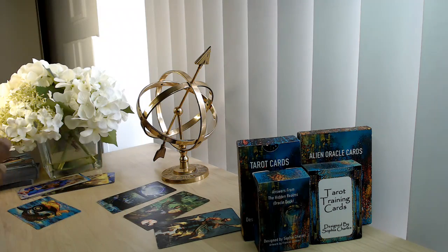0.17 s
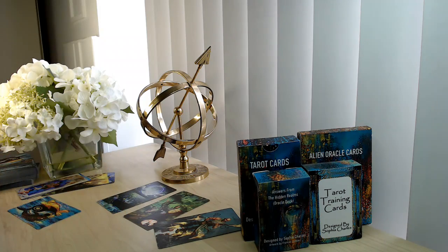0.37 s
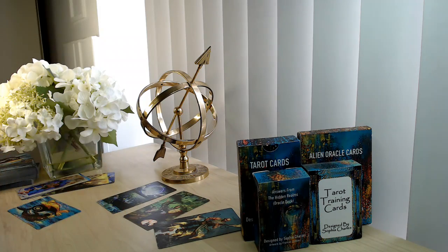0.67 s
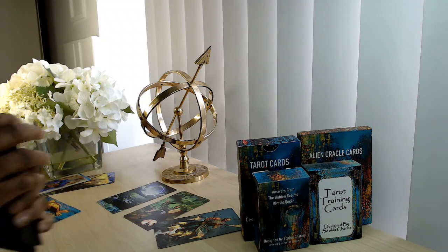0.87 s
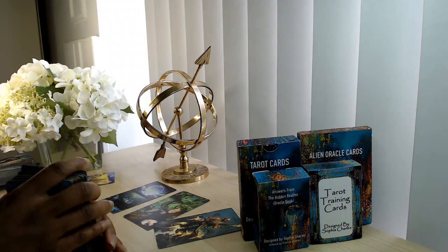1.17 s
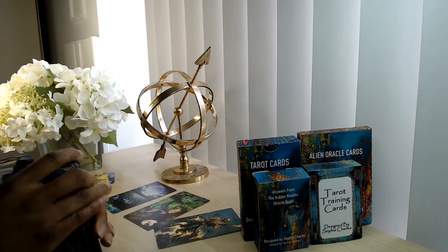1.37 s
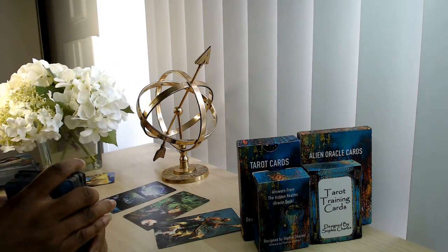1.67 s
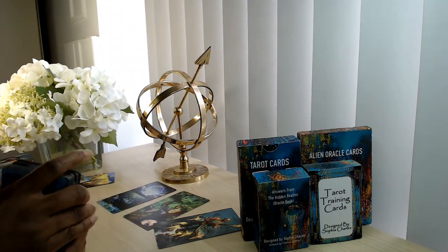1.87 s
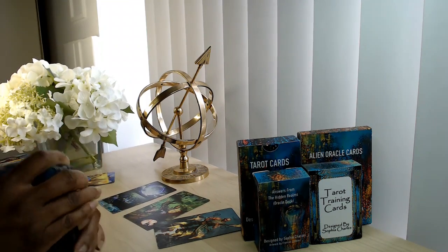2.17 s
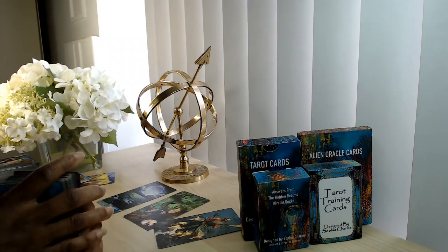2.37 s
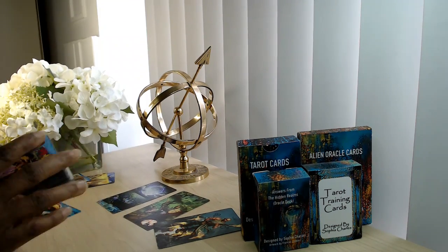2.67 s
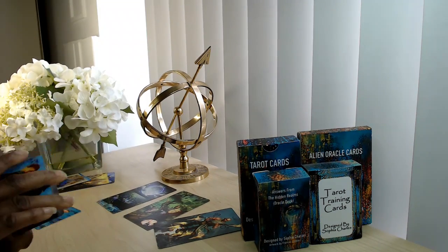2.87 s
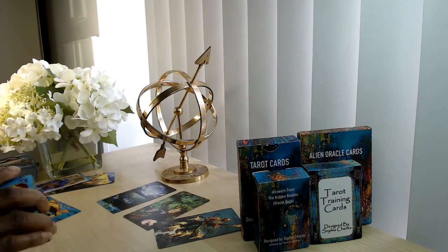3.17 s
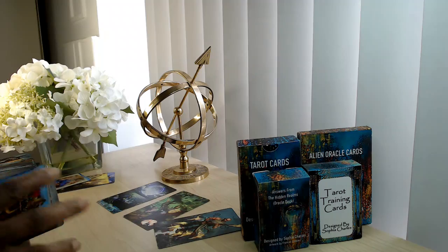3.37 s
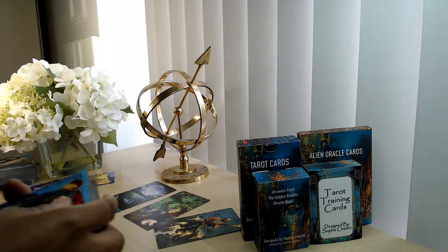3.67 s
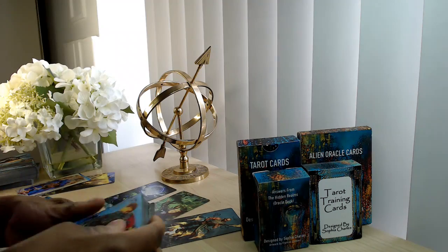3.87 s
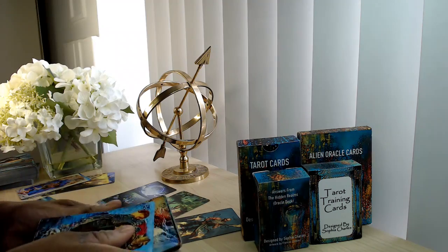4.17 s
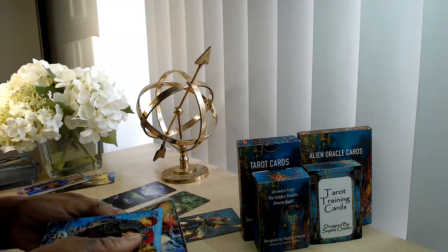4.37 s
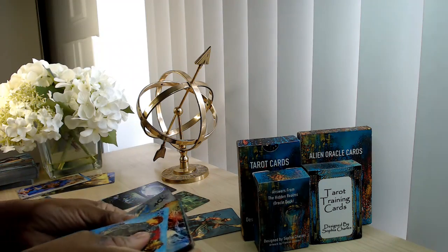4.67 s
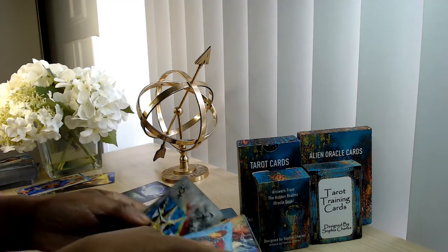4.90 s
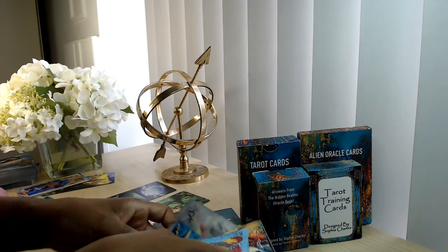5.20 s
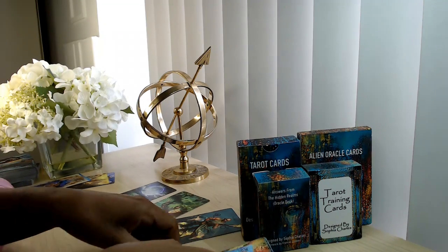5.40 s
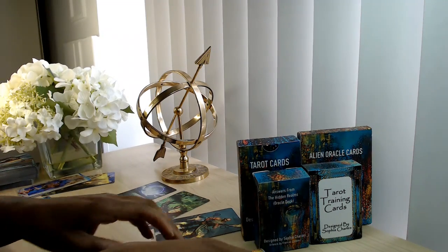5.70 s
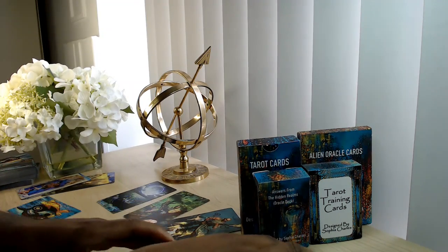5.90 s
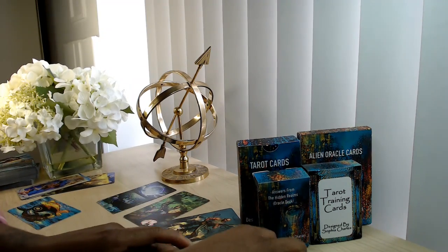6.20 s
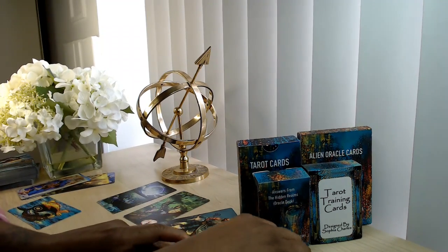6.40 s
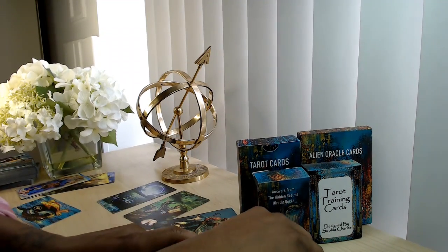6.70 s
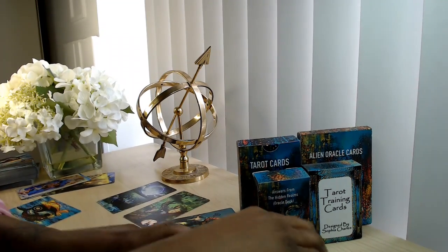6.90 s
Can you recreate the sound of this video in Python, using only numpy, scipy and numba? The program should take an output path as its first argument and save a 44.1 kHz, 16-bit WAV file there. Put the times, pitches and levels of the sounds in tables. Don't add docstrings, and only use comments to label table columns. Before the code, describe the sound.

Close stereo microphone in a small furnished room with a faint low hum. After slight card rustling, a deck of cards is knocked three times on a wooden table, sharp and woody with small rattling bounces. A quiet pause follows with faint handling, then a sudden crisp flick starts a flurry of snaps, papery slides and soft pats, ending with one card slapped down and a few faint touches.

```python
import sys
import numpy as np
from scipy import signal
from scipy.fft import rfft, irfft
from scipy.io import wavfile
from scipy.ndimage import uniform_filter1d
from numba import njit

SR = 44100
rng = np.random.default_rng(int(sys.argv[2]) if len(sys.argv) > 2 else 0)


def master(y):
    cut = np.clip(np.atleast_2d(y).T, -1, 1)
    pcm = np.round(cut * 32767)
    wavfile.write(sys.argv[1], SR, pcm.astype(np.int16))


def invert_db(level):
    return 10 ** (np.asarray(level, dtype=float) / 20)


N = 310860
PORT_TILT_DB = np.array([[-1.2], [1.2]])
HANDS_PAN_DB = -4


def colour(x, points):
    hz, db = np.transpose(points)
    f = np.log(np.maximum(np.arange(1025) * SR / 2048, 1))
    c = irfft(np.interp(f, np.log(hz), db) * np.log(10) / 20)
    c[1:1024] *= 2
    c[1025:] = 0
    return signal.fftconvolve(x, irfft(np.exp(rfft(c))))[:len(x)]


def band(x, lo_hz, hi_hz):
    sos = signal.butter(2, [lo_hz, min(hi_hz, .49 * SR)], "band", fs=SR, output="sos")
    return signal.sosfilt(sos, x)


def unit(x):
    return x / np.sqrt(np.mean(x ** 2))


def ring(hz, t60, phase=0.):
    t = np.arange(SR // 2) / SR
    return np.sin(2 * np.pi * hz * t + phase) * 1000 ** (-t / np.maximum(t60, .001))


def add(out, s, sound, db, pan_db):
    i = int(s * SR)
    sound = sound[:N - i] / np.abs(sound).max()
    out[:, i:i + len(sound)] += sound * invert_db(db + np.array([[pan_db], [-pan_db]]) / 2)


def walk(rate):
    k = int(SR / rate)
    steps = np.repeat(rng.standard_normal(N // k + 1), k)
    return 1.2 * uniform_filter1d(steps, k)[:N]


@njit
def svf(x, hz, width):
    y, b, l = np.empty(len(x)), 0., 0.
    for i in range(len(x)):
        g, k = np.tan(np.pi * hz[i] / SR), width / hz[i]
        v = (b + g * (x[i] - l)) / (1 + g * (g + k))
        b, l, y[i] = 2 * v - b, l + 2 * g * v, k * v
    return y


def swell(s, db, rise_s, fall_s):
    t = np.arange(0, N + 64, 64) / SR - s[:, None]
    rising = -t / np.maximum(rise_s, .002)[:, None]
    falling = t / np.maximum(fall_s, .002)[:, None]
    return invert_db(db[:, None] - 30 * np.where(t < 0, rising, falling))


def total(gains, rest_db):
    power = np.sum(gains ** 2, 0) + invert_db(rest_db) ** 2
    return np.interp(np.arange(N), 64 * np.arange(len(power)), np.sqrt(power))


# pitch_hz, level_db (per Hz)
AIR = [(50, -23.5), (90, -6), (140, -3.5), (180, -8), (240, -7), (380, -19), (640, -20.5), (900, -20),
       (1300, -28), (2500, -30.5), (5000, -36.5), (8000, -44.5), (10000, -53), (16000, -60)]
AIR_DB = -74


def air():
    mid, side = (colour(rng.standard_normal(N) * invert_db(0.76 * walk(12)), AIR) for _ in range(2))
    side = colour(side, [(100, -7.0), (800, -6.0), (4000, -3.5), (15000, 8.0)])
    shared = unit(mid) * invert_db(AIR_DB + PORT_TILT_DB)
    return shared + side / mid.std() * invert_db(AIR_DB) * np.array([[1], [-1]])


# pitch_hz, level_db
WHINE = [
    (5470, -103),
    (8000, -97.5),
]


def whine():
    t = np.arange(N) / SR
    (hz, db), (frame_hz, frame_db) = WHINE
    frames = np.clip(1.6 * np.cos(2 * np.pi * (30 * t - .6)), 0, 1)
    steady = invert_db(db + 2 * walk(32)) * np.sin(2 * np.pi * hz * t)
    return steady + invert_db(frame_db) * frames * np.sin(2 * np.pi * frame_hz * t)


# peak_s, level_db, rise_s, fall_s; both spans cover 30 dB
SWELLS = [(.06, -52, 0.58, 0.11), (1.66, -53, 0.16, 0.34), (.29, -50.5, 0.11, 0.24),
          (.57, -53.5, 0.44, 0.11), (.78, -56, 0.16, 0.31), (1.052, -48, 0.16, 0.36),
          (1.38, -51.5, 0.54, 0.75), (1.75, -53.5, 0.58, 0.8), (2.168, -59.5, 0.11, 0.23),
          (2.76, -55.5, 0.21, .25), (1.8, -53.5, 0.14, 0.23), (3.27, -62, 0.18, .2),
          (2.95, -60, 0.23, 0.53), (3.47, -55, 0.17, 0.36), (3.92, -52, 0.11, 0.16), (4.2, -52, 0.19, 0.23),
          (4.67, -56, 0.2, 0.2), (4.93, -53, 0.32, 0.085), (5.16, -54.5, 0.18, 0.33),
          (5.38, -58.5, 0.57, 0.071), (6.06, -71.5, 0.27, 0.096), (6.14, -51, .15, 0.11),
          (6.52, -60, 0.38, 0.34), (6.79, -60, 0.45, 0.58)]
# level_db, build_s, first_null_s, t60_s
SWAY = [
    (-35.5, .09, 0.22, 0.61),
    (-37, .05, 0.19, 1),
    (-33, .06, 0.49, 0.81),
    (-25, 0.039, .21, 0.85),
]
DRONE_HZ, DRONE_DB, FLUTTER_DB = 48, -65, 1.5


def drone():
    t = np.arange(N) / SR
    size = total(swell(*np.transpose(SWELLS)), DRONE_DB) * invert_db(FLUTTER_DB * walk(20))
    for (s, *_), (db, build_s, null_s, t60) in zip(KNOCKS, SWAY):
        since = np.maximum(t - s, 0)
        beating = np.cos(np.pi / 2 * since / null_s) * 1000 ** (-since / t60)
        size = size + invert_db(db) * (1 - np.exp(-since / build_s)) * beating
    return np.sqrt(2) * np.sin(2 * np.pi * DRONE_HZ * t) * size * invert_db(PORT_TILT_DB)


# pitch_hz, t60_s
ROOM = [(100, 0.36), (400, 0.28), (1500, .28), (3000, 0.26), (6000, 0.25), (12000, 0.22)]
ROOM_DB = -1
EARLY_T60_S, LATE_DB = 0.03, -8.5


def room(dry):
    t, tail = np.arange(SR // 2) / SR, 0
    hz, t60 = np.transpose(ROOM)
    for f in 60 * 2 ** np.arange(0, 8.5, .5):
        mid, side = band(rng.standard_normal((2, len(t))), f / 2 ** .25, f * 2 ** .25)
        decay = np.interp(np.log(f), np.log(hz), t60)
        apart = np.clip(f / 1800, .35, 1)
        fade = 1000 ** (-t / EARLY_T60_S) + invert_db(LATE_DB) * 1000 ** (-t / decay)
        both = unit(mid * fade) + apart * unit(side * fade) * np.array([[1], [-1]])
        tail = tail + both * np.sqrt(f / (1 + apart ** 2))
    tail = tail * np.clip(t / 0.0015 - .5, 0, 1)
    tail = tail / np.sqrt(np.sum(tail[0] ** 2))
    return invert_db(ROOM_DB) * signal.fftconvolve(tail, dry.mean(0)[None])[:, :N]


# start_s,
# level_db, pitch_hz, t60_s
PATS = [(1.818, -57, 422, 0.094), (3.905, -59.5, 271, 0.15), (4.677, -50.5, 350, 0.099),
        (4.772, -31, 695, 0.065), (4.799, -54, 716, 0.075), (5.344, -31, 354, 0.028),
        (5.358, -38, 343.6, 0.18), (5.552, -47.5, 339, 0.36), (5.712, -43, 720, 0.11),
        (5.732, -41.5, 710, 0.078), (6.044, -43.5, 358, 0.14), (6.128, -62, 754, 0.11),
        (5.729, -57.5, 3326, 0.2), (3.742, -51, 1410, 0.12), (3.72, -60.5, 430, 0.13),
        (3.937, -55, 924, 0.092), (6.898, -57, 355, 0.14), (0.502, -62, 1235, 0.17), (.53, -59, 710, .08),
        (4.788, -41, 1080, 0.065), (4.789, -39.5, 393, 0.14), (5.002, -41.5, 1048, 0.044),
        (5.225, -41.5, 1075, 0.19), (5.43, -55, 800, 0.11), (5.639, -39, 333, 0.18),
        (6.051, -41, 456, 0.086), (6.38, -65, 350, 0.36), (6.86, -65.5, 749, 0.067)]
# start_s, level_db, pitch_hz, t60_s
THUDS = [(4.668, -46.5, 89.4, 0.054), (4.685, -43.5, 96, 0.13), (4.78, -46, 254, 0.072),
         (4.94, -46, 170, 0.05), (5.198, -47, 193, 0.027), (5.345, -39.5, 208, 0.036),
         (6.045, -49.5, 109.4, 0.22), (1.62, -42.5, 119, 0.19), (4.661, -52.5, 188.8, .12),
         (5.189, -46.5, 339, .1)]


def pats():
    out = np.zeros((2, N))
    for s, db, hz, t60 in PATS + THUDS:
        push = 1 - np.exp(-np.arange(SR // 2) / SR / 0.0036)
        beat = invert_db(5 * walk(130)[:SR // 2])
        grain = unit(band(rng.standard_normal(SR // 2), .6 * hz, 1.7 * hz)) * ring(0, 0.71 * t60, np.pi / 2)
        tone = ring(hz, t60) + 0.25 * grain + 0.064 * ring(0.49 * hz, 1.2 * t60)
        add(out, s, push * beat * tone, db - 3.0, HANDS_PAN_DB)
    return out


# fastest_s, card_level_db, speed_up_s, slow_down_s, hiss_db; spans cover 30 dB
SLIDES = [(4.77, -43, 0.015, 0.085, 2), (4.797, -35.5, 0.018, 0.12, -28), (4.84, -44, 0.012, 0.072, -30),
          (4.91, -54, 0.2, 0.45, -29), (4.951, -46.5, 0.035, 0.078, -11), (4.977, -46.5, 0.2, 0.095, -14),
          (5.04, -76, 0.15, 0.44, -16), (5.15, -61.5, 0.071, 0.23, -23), (5.179, -53, 0.008, 0.1, -17),
          (5.219, -37.5, 0.024, 0.023, -26), (5.242, -31, 0.043, 0.023, -13),
          (5.265, -61.5, 0.033, 0.06, 6), (5.337, -53.5, 0.006, 0.077, -31),
          (5.354, -49, 0.026, 0.089, -33), (5.566, -50.5, 0.045, 0.13, -22),
          (5.611, -48.5, 0.043, 0.045, -20), (5.704, -57, 0.039, 0.15, -24), (5.76, -67, 0.13, 0.065, 0),
          (6.044, -64, 0.0085, 0.17, -32.5)]
# fastest_s, card_level_db, speed_up_s, slow_down_s, hiss_db
FIDGETS = [(.12, -105, 0.085, 0.047, 32), (.21, -111, 0.068, 0.071, 33), (.284, -81.5, 0.031, 0.19, 1),
           (.546, -68.5, 0.16, 0.082, -4), (0.665, -64, 0.023, 0.085, -14), (1.78, -82, 0.09, 0.025, 9),
           (3.25, -102.5, 0.12, 0.3, 27), (3.64, -90, 0.095, 0.41, 14.5), (3.727, -60, 0.06, 0.14, -21),
           (3.774, -69.5, 0.14, 0.043, -1), (3.939, -68, 0.036, 0.067, 5), (4.14, -77.5, 0.16, 0.13, 5.5),
           (4.225, -72, 0.052, 0.071, 0.5), (4.451, -71.5, 0.069, 0.19, 1.5), (4.54, -80.5, 0.088, 0.11, 0),
           (4.66, -78, 0.16, 0.33, -18.5), (6.219, -76.5, 0.022, 0.065, 11.5),
           (6.486, -81.5, 0.065, 0.23, -1), (6.865, -87, 0.076, 0.16, 11)]
# fastest_s, level_db, speed_up_s, slow_down_s
DRAGS = [(3.75, -62.5, .1, 0.16), (4.66, -61, 0.081, 0.084), (0.674, -54, .02, 0.13),
         (3.94, -81, 0.017, 0.15), (4.789, -35.5, 0.033, 0.03), (5.04, -63, 0.16, 0.12),
         (5.36, -44, 0.063, 0.022), (5.411, -45.5, 0.065, 0.039), (6.047, -45.5, 0.016, 0.1),
         (6.87, -77, 0.058, 0.1)]
# time_s, pitch_hz
BEND = [(.3, 2000), (.66, 1720), (3.75, 1607), (4.4, 2400), (4.8, 2470), (4.97, 2171), (5.22, 1880),
        (5.35, 2250), (5.56, 1620), (6.1, 1600)]
# pitch_hz, width_hz, level_db
TOP = [(393, 180, -2.5), (716, 64, -0.5), (1080, 28, -2.5)]
WOOD_DB, WOOD_DB_PER_DB, REST_DB = 4, -.5, -91.5


def slides():
    s, db, rise, fall, hiss_db = np.transpose(SLIDES + FIDGETS)
    speed = swell(s, db, rise, fall)
    hz = np.interp(np.arange(N) / SR, *np.transpose(BEND))
    wood_db = WOOD_DB + WOOD_DB_PER_DB * (db + 68.0)
    slip_db = np.minimum(2.4 * rng.exponential(size=N), 11)
    grit = rng.standard_normal(N) * invert_db(slip_db + 2 * walk(200) + 1.5 * walk(60))
    card = unit(svf(grit, hz * (1 + .08 * walk(40)), 550.)) + .6 * unit(band(grit, 1400, 3800))
    card += 0.033 * unit(svf(grit, 0.44 * hz * (1 + 0.064 * walk(35)), 500.))
    card += 0.083 * unit(svf(grit, 3350 * (1 + 0.068 * walk(30)), 300.))
    table_grit = grit[::-1].copy()
    wood = invert_db(1.4 * walk(30)) * unit(band(band(table_grit, 270, 1800), 210, 1700))
    modes = sum(invert_db(top_db) * svf(table_grit, np.full(N, 1. * f), 1. * w) for f, w, top_db in TOP)
    wood = 0.38 * wood + 0.87 * unit(modes)
    bright = grit + 2.5 * svf(grit, 5200 * (1 + 0.3 * walk(25)), 1600.)
    hiss = unit(colour(bright, [(2500, -25.5), (3600, 13.0), (6500, 0.5), (8500, -10.5),
                                (11000, -12.0), (15500, -15.5)]))
    wood_gains = np.vstack([speed * invert_db(wood_db)[:, None], swell(*np.transpose(DRAGS))])
    rub = card * total(speed, REST_DB) + wood * total(wood_gains, REST_DB + 7.5)
    rub += invert_db(2.3 * walk(81)) * hiss * total(speed * invert_db(hiss_db)[:, None], REST_DB - 5)
    return rub * invert_db(-6.0 + PORT_TILT_DB)


# start_s, level_db, pitch_hz, chatter_db
TICKS = [(0.661, -46, 1310, -38), (0.674, -41, 1780, -29), (3.249, -64.5, 1483, 9),
         (3.748, -43.5, 1470, -5.5), (3.932, -48, 1070, -6), (4.659, -58.5, 2437, -13),
         (4.7598, -50, 1080, -18), (4.764, -28.5, 2260, -26), (4.7874, -13, 2010, 3.5),
         (4.832, -17.5, 2390, -8), (4.856, -26.5, 2080, -29), (4.91, -36, 2290, -24),
         (4.9419, -34, 2460, -11), (4.9695, -34, 2020, -23), (4.98, -29, 1880, -9),
         (5.1284, -50, 2070, -8.5), (5.1339, -52, 2040, -8), (5.177, -31, 2150, -16),
         (5.183, -34, 1375, -9), (5.2162, -33, 1880, -20), (5.22, -25.5, 1800, -16),
         (5.2356, -54, 2080, -27), (5.24, -47, 2300, -29), (5.336, -44, 1900, -15),
         (5.3534, -34, 1920, -14), (5.359, -39, 3080, 20), (5.377, -46, 2400, -12),
         (5.3988, -48, 1060, -10), (5.548, -44, 1670, -30), (5.564, -50, 1900, -10),
         (5.522, -60, 1295, -10), (4.875, -37, 2100, -16), (4.925, -33, 2000, -18), (5.615, -23, 1590, -6),
         (5.618, -14.5, 1420, -11.5), (6.04, -46.5, 1400, 0), (4.686, -59, 2400, -8.5),
         (6.208, -57.5, 2894, 1), (6.223, -63, 3500, 15)]
DELAY_S = 0.0013


def ticks():
    out = np.zeros((2, N))
    for s, db, hz, chatter_db in TICKS:
        chatter = band(rng.standard_normal(SR // 2) * ring(0, 0.007, np.pi / 2), 1400, 4450)
        snap = band(ring(hz, 11.6 / hz, 0.13), 260, 20000)
        flick = invert_db(chatter_db) * chatter / np.abs(chatter).max() - snap
        add(out, s + DELAY_S, flick, db - 0.5, HANDS_PAN_DB)
    return out


def crack(points, chatter_s):
    t = np.arange(SR // 2) / SR
    push = 0.079 * rng.standard_normal(len(t)) * np.exp(-t / chatter_s)
    push[0] = 1
    return colour(push, points)


# start_s, level_db, crack_db, lead_in_s, lead_in_db
KNOCKS = [
    (1.064, -9.5, -12, 0.0068, -10.5),
    (1.465, -0.5, -5.5, 0.0087, -14),
    (2.2019, -1, -8.5, 0.0053, -15.5),
    (5.622, -19, -38, 0.0079, -6.5),
]
# pitch_hz, level_db (per Hz)
CRACK = [
    [(710, -35), (1200, 0), (2530, -13), (2760, -17.5), (4700, -25.5), (13200, -45.5), (16000, -40.5)],
    [(710, -30), (1200, -3), (1310, -14.5), (1470, -6.5), (2530, -3), (4000, -20), (14700, -40),
     (16000, -34)],
    [(710, -26), (1200, 3.5), (1660, -14), (1910, -1), (2760, -13.5), (3700, -14), (9000, -32),
     (16000, -34.5)],
    [(710, -31), (1200, -14), (1700, 4), (2060, -31), (2270, -44), (3110, -17), (9000, -21), (16000, -18)],
]
# free_swing_s, level_change_db
GRIP = [
    (0.12, -9.5),
    (.035, -7.5),
    (0.043, -8),
    (.05, 1.5),
]
# pitch_hz, t60_s, then level_db for each of the
BODY = [(105, 0.16, -21.5, -11.5, -19, 14), (142.95, 0.28, 1, -5, -1, 4), (188, 0.19, -8, -1.5, 1, -2.5),
        (254, 0.25, -17, -13.5, -9.5, -16), (311, 0.072, -15.5, -1.5, -5.5, -12),
        (344.4, 0.34, -13, -3, -7, -6), (407, 0.16, -1, -4.5, -8, -40), (425.9, 0.17, -10, -7.5, 2.5, -16),
        (520.5, 0.037, -17.5, -12.5, -13, -10.5), (637, 0.11, -20, -21.5, -7.5, -58.5),
        (642, 0.25, -12.5, -11.5, -16, -45), (728, 0.35, -20.5, -11.5, -15, -27.5),
        (772, 0.18, -7, -1.5, -7.5, -9.5), (905, 0.27, -17, -13, -14, -16), (984, 0.1, -4.5, -4, -4.5, -26),
        (1100, 0.09, -11, -5.5, -10, -11.5), (1300, 0.13, -12.5, -21, -14, -26),
        (1500, 0.09, -19, -15.5, -19, -34.5),
        (505.7, 0.51, -21, -33.5, -24.5, -53), (652, 0.65, -40, -32.5, -27, -56.5),
          (419.8, 0.74, -50, -50.5, -49.5, -31.5),
        (557, 0.36, -21, -19.5, -11, -30), (976, .12, -7.5, -16, -16, -28),
        (1715, 0.15, -20, -23.5, -24.5, -37), (1965, .1, -26, -19.5, -22, -43),
        (1113.7, 0.016, -5.5, 0, -7.5, -32), (1400, .07, -21, -18.5, -14.5, -37),
        (1560, 0.076, -23.5, -24, -18, -19), (1880, .06, -21.5, -18.5, -22, -34),
        (2400, .05, -22, -19, -28, -39), (2760, 0.034, -25.5, -17.5, -28, -34),
        (3280, .05, -36, -21.5, -30, -42)]
# start_s, level_db
BOUNCES = [(1.0633, -16.5), (1.0678, -25), (1.087, -13), (1.0951, -23.5), (1.464, -6), (1.4782, -17),
           (1.5176, -26.5), (2.2012, -9), (2.2027, -12), (2.206, -10), (2.216, -19.5), (2.224, -17.5),
           (2.233, -20.5), (2.297, -36.5)]
KNOCK_PAN_DB = 0.3
SPREAD = .02


def knocks():
    body, edge, blow = np.zeros((3, 2, N))
    t, pan = np.arange(SR // 2) / SR, KNOCK_PAN_DB
    for k, (s, db, crack_db, lead, lead_db) in enumerate(KNOCKS):
        swing_s, damping_db = GRIP[k]
        grip = invert_db(damping_db / (1 + np.exp((swing_s - t) / 0.0037)))
        wood = 0
        for f, t60, *gains in BODY:
            beat = invert_db(3.5 * walk(60)[:len(t)])
            tone = ring(f, t60, rng.uniform(-0.072, .6))
            for side in (-1, 1):
                near_hz = f * (1 + side * SPREAD * rng.uniform(.5, 1.5))
                tone = tone + 0.24 * ring(near_hz, t60, rng.uniform(0, 2))
            wood = wood + invert_db(gains[k]) * beat * tone * np.minimum(t * f, 1)
        wood = band(wood, 61, 19000)
        add(body, s, wood * grip, db, pan)
        add(body, s - lead, wood * np.exp(-t / 0.003), db + lead_db, pan)
        add(blow, s, wood * np.exp(-t / 0.006), db, 0)
        add(blow, s, crack(CRACK[k], 1 / SR), crack_db + 3.5, 0)
        add(edge, s, crack(CRACK[k], 0.0034), crack_db, pan)
        add(edge, s - lead, crack(CRACK[k], 0.021), crack_db + lead_db - 9.5, pan)
    for s, db in BOUNCES:
        add(edge, s + DELAY_S, crack(CRACK[0], 0.005), db - 5.5, 0)
    return body, edge, blow


def ports(x, phase, lean=((100, 0), (1000, 0))):
    f = np.log(np.maximum(np.arange(N // 2 + 1) * SR / N, 1))

    def read(points):
        hz, value = np.transpose(points)
        return np.interp(f, np.log(hz), value)

    left = irfft(rfft(x[0]) * invert_db(read(lean) / 2), N)
    right = irfft(rfft(x[1]) * np.exp(-1j * read(phase)) * invert_db(-read(lean) / 2), N)
    return np.array([left, right])


# pitch_hz, lead_radians
KNOCK_PHASE = [(600, 0.02), (1210, 0.17), (2070, 2.7), (2930, 0.68), (4050, 2.44), (7000, 1.5),
               (11000, 1.5)]
# pitch_hz, left_minus_right_db
KNOCK_LEAN = [(60, 0.35), (110, 3.5), (200, 1.56), (380, -2.5), (1290, -1.76), (4400, 2), (8120, 0.04)]
# pitch_hz, lead_radians
HANDS_PHASE = [(600, .1), (1720, .3), (3450, 0.9), (3960, 1.9), (4800, .8), (7580, 1.7), (12700, .4)]


def scene():
    body, edge, blow = knocks()
    small = ticks() + slides() + pats()
    background = ports(air() + drone(), [(100, .06), (2000, 1.6)]) + whine()
    direct = ports(body + edge, KNOCK_PHASE, KNOCK_LEAN) + ports(small, HANDS_PHASE)
    echoes = room(0.44 * edge + 0.55 * small + band(blow, 55, 21000))
    return background + direct + echoes


def low_pass(x):
    return signal.sosfilt(signal.butter(12, 16610, fs=SR, output="sos"), x)


def record(dry):
    rounded = np.tanh(0.57 * dry) / 0.63
    top_cut = signal.ellip(8, .2, 50, 15950, fs=SR, output="sos")
    return low_pass(signal.sosfilt(top_cut, rounded))


dry = scene()
out = record(dry)
master(out)
```